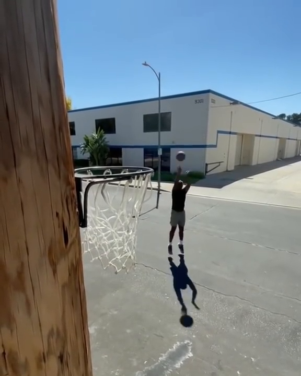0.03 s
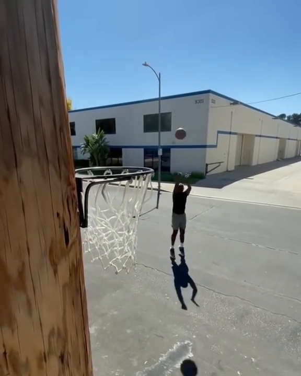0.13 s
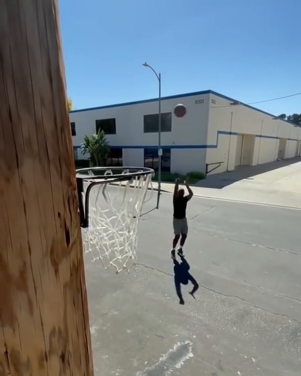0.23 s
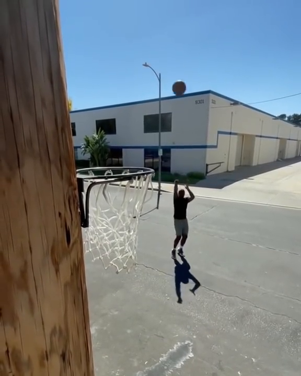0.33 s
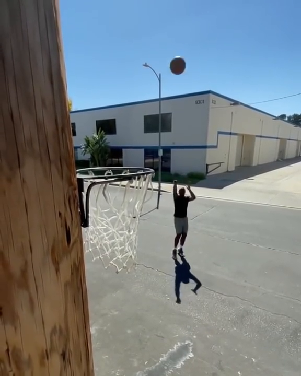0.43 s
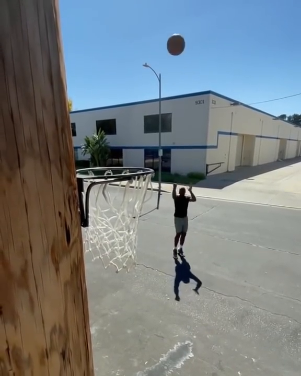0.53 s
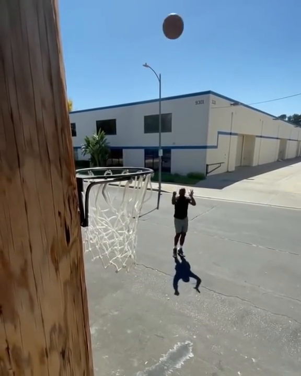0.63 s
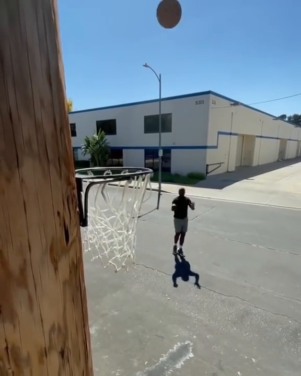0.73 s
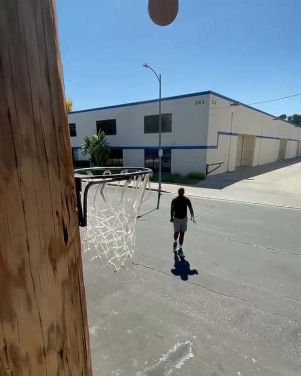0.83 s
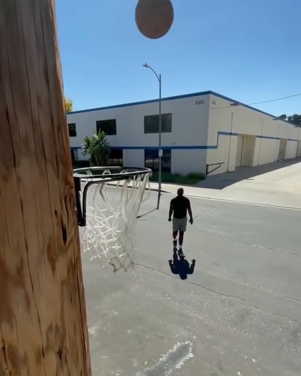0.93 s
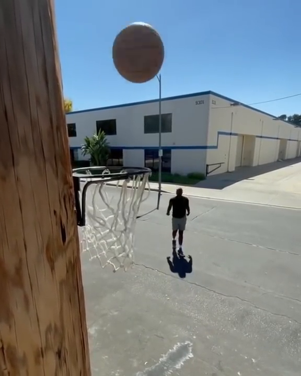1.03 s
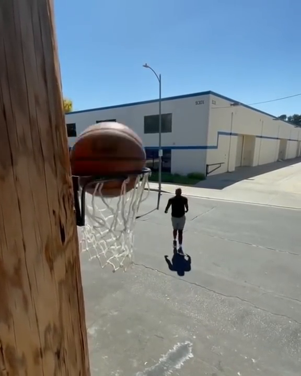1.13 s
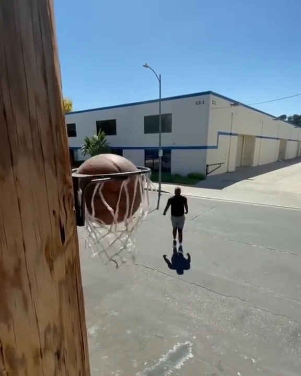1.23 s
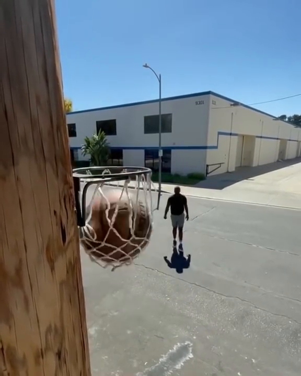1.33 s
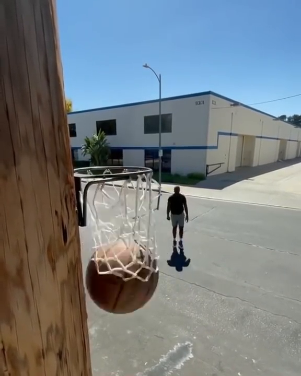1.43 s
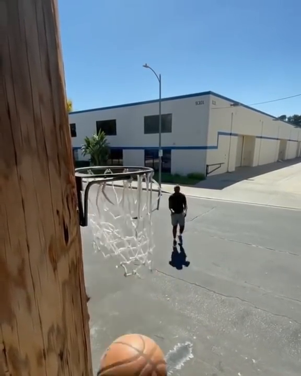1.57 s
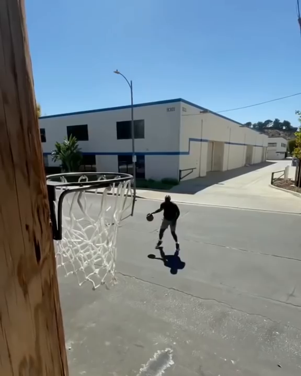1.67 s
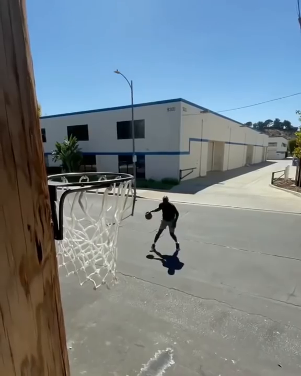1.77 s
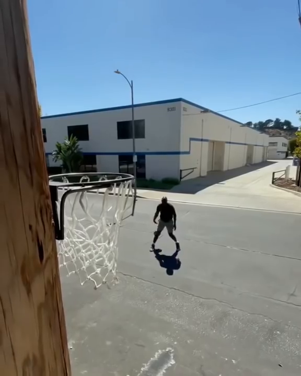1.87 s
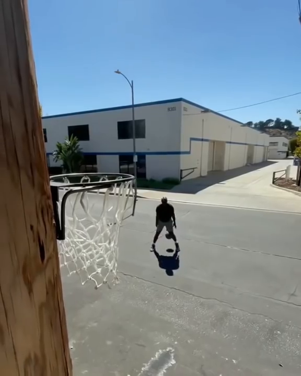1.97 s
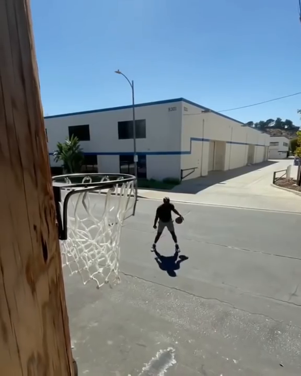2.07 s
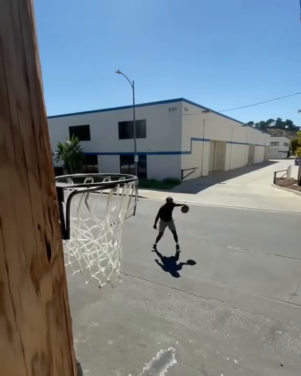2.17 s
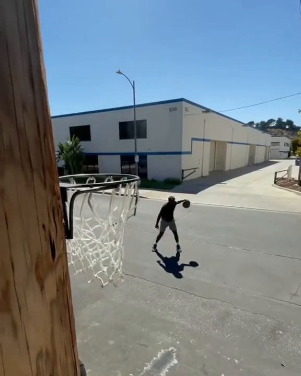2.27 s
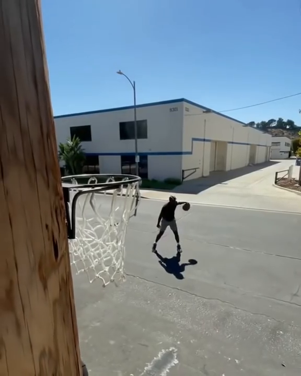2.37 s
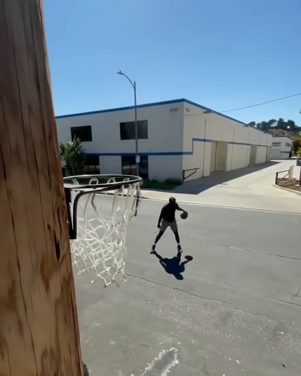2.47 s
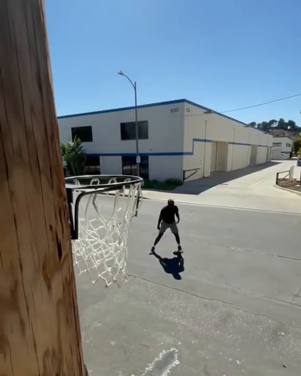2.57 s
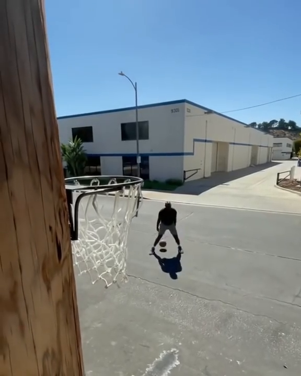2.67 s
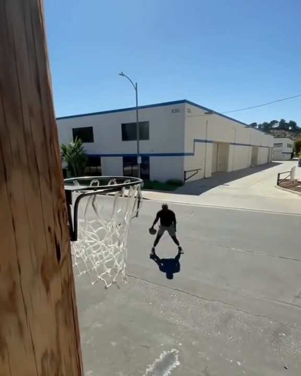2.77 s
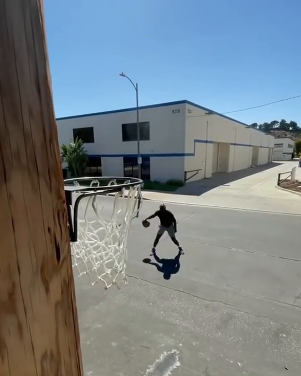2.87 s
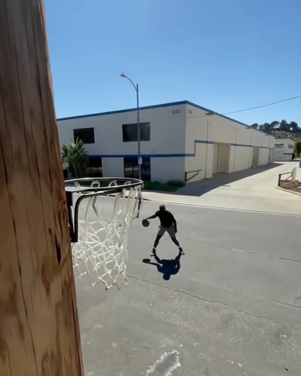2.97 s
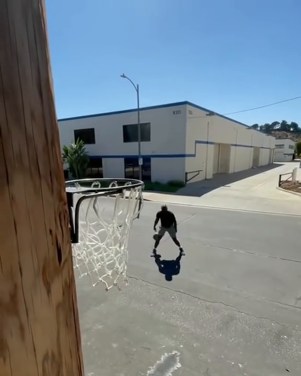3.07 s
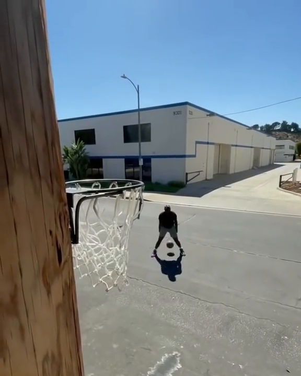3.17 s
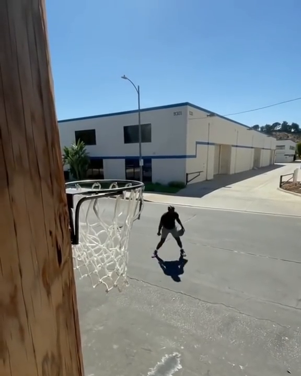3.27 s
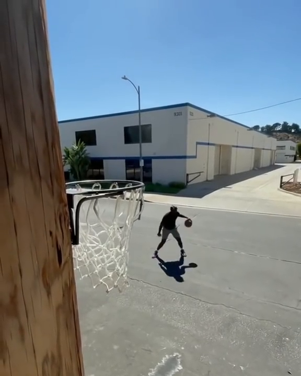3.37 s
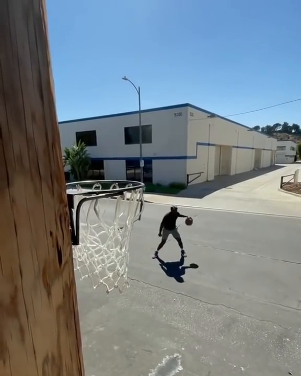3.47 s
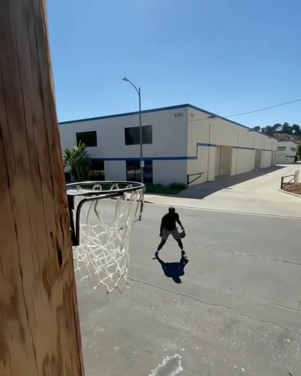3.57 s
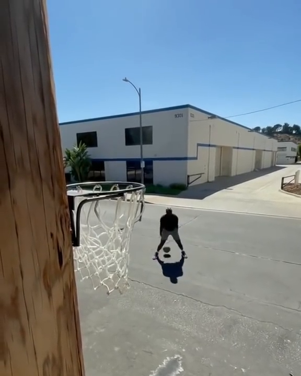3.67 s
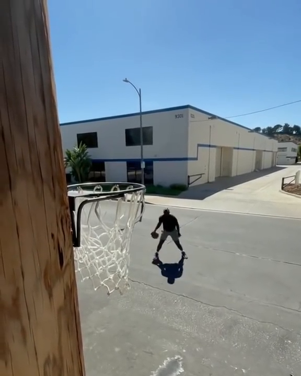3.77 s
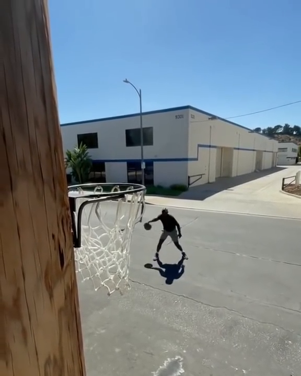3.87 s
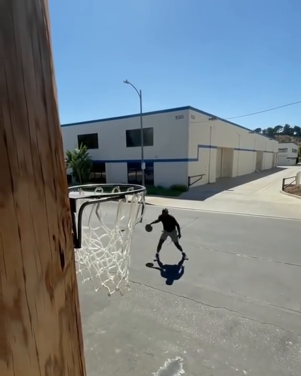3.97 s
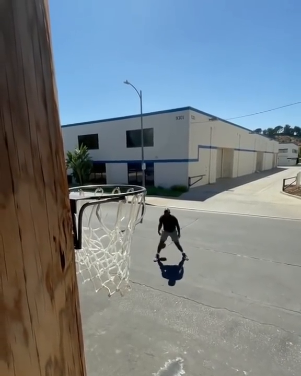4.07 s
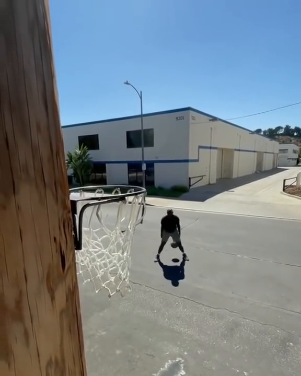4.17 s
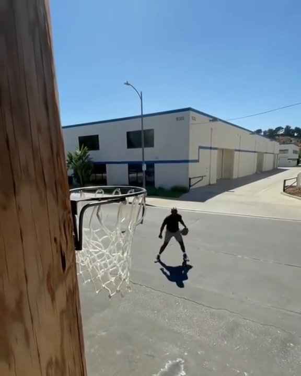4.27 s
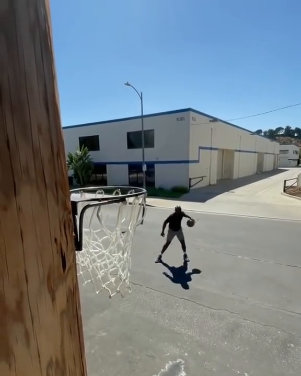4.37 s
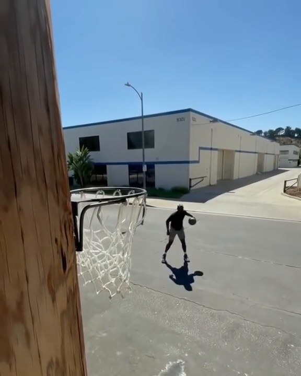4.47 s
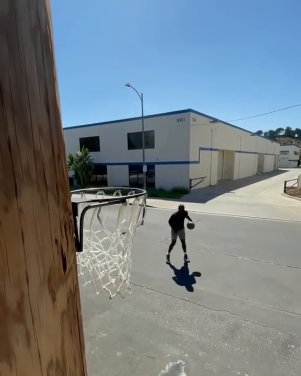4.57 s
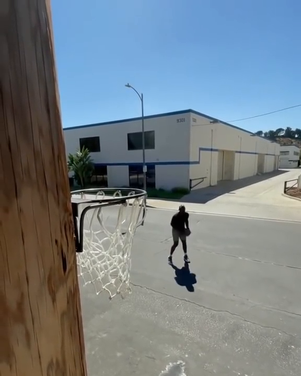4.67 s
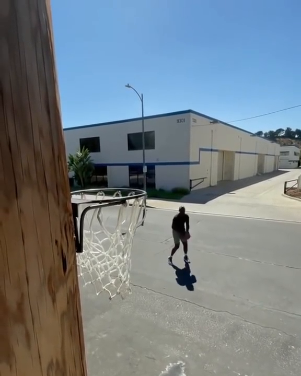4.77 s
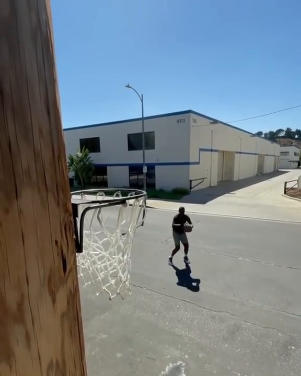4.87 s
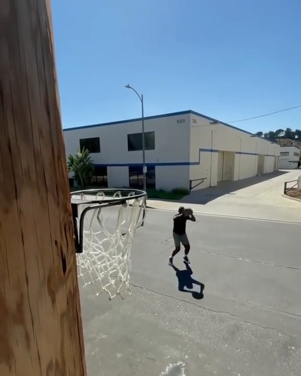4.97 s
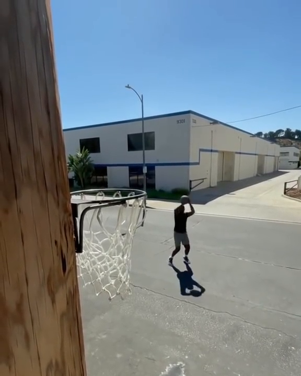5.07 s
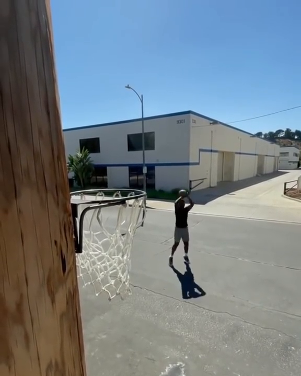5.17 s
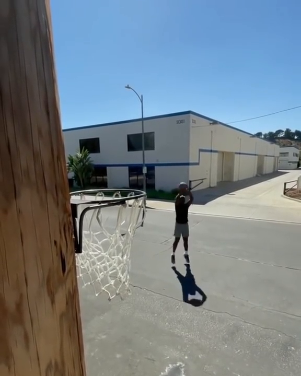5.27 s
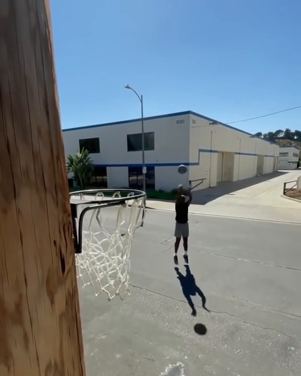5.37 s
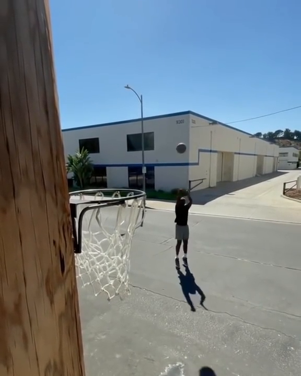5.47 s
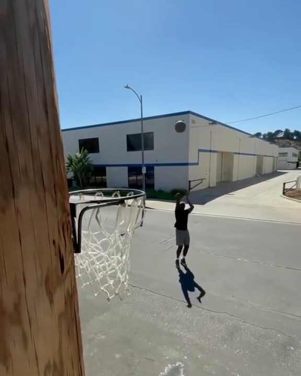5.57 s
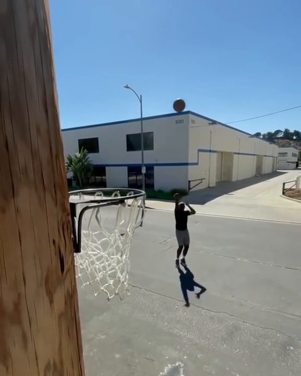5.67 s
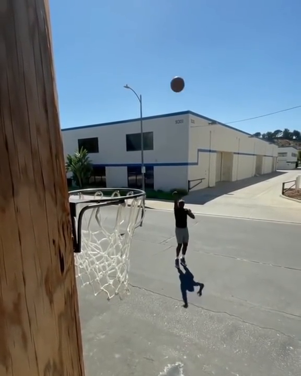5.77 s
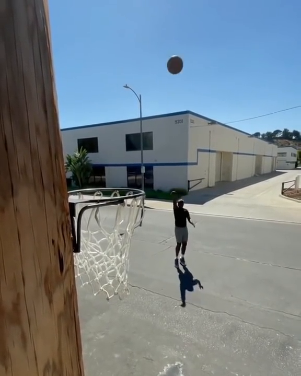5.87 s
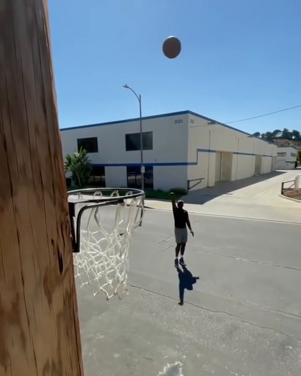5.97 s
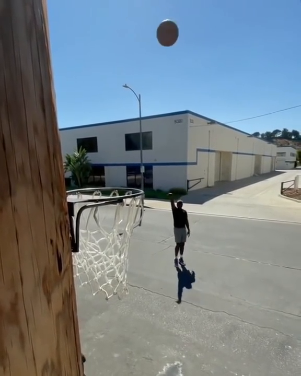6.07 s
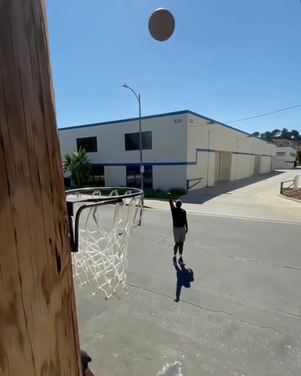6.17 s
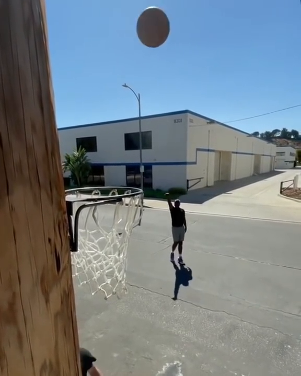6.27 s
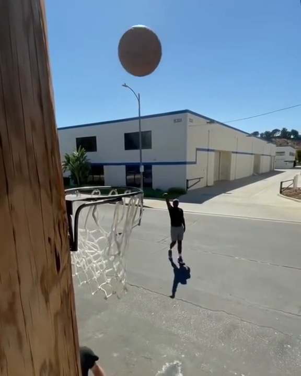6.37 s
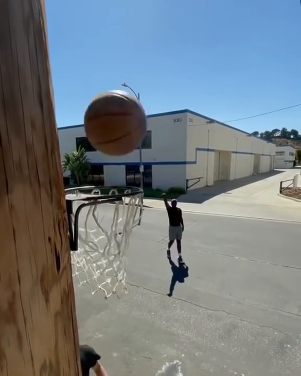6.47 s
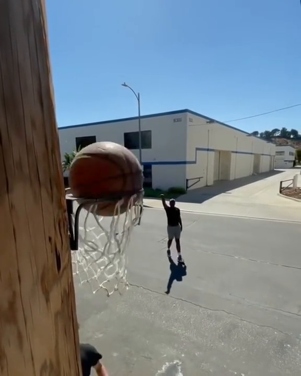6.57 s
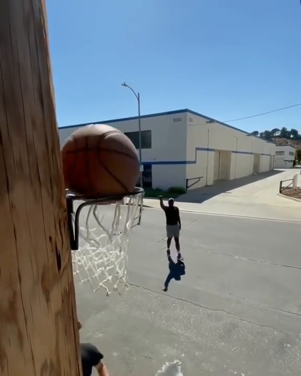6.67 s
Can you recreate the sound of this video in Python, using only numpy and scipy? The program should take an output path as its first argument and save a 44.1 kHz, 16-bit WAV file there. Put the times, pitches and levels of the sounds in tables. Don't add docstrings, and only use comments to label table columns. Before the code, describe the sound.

On an open street, a basketball hits a steel rim in a quick, loud double knock that shudders the wooden pole, and the net snaps. After a brief dip in level, five firm slapping bounces on asphalt follow some metres off, then a faint touch. Shoes scuff, wind buffets, and a final hard rim clatter ends it. Stereo phone microphone fixed to the pole.

```python
import sys
import numpy as np
from scipy import signal
from scipy.fft import rfft, irfft
from scipy.io import wavfile
from scipy.ndimage import uniform_filter1d

SR = 44100
rng = np.random.default_rng(int(sys.argv[2]) if len(sys.argv) > 2 else 0)


def gain_from_db(level_db):
    decades = np.asarray(level_db, float) / 20
    return 10 ** decades


def dump(signal):
    limited = np.clip(np.atleast_2d(signal).T, -1, 1)
    pcm = np.round(limited * 32767).astype(np.int16)
    wavfile.write(sys.argv[1], SR, pcm)


N = 295581
OPPOSITE = np.array([[1], [-1]])


def span(seconds):
    return np.arange(int(seconds * SR)) / SR


def colour(x, points):
    hz, db = np.transpose(points)
    f = np.maximum(np.fft.rfftfreq(x.shape[-1], 1 / SR), 1)
    gain = gain_from_db(np.interp(np.log(f), np.log(hz), db))
    y = irfft(rfft(x) * gain, x.shape[-1])
    return y / np.sqrt(np.mean(y ** 2))


def band(x, hz, octaves):
    edges = np.clip(hz * 2 ** np.array([-octaves / 2, octaves / 2]), 10, .45 * SR)
    return signal.sosfilt(signal.butter(2, edges, "band", fs=SR, output="sos"), x)


def walk(rate_hz):
    k = int(SR / rate_hz)
    held = np.repeat(rng.standard_normal(N // 200), k)[:N]
    return uniform_filter1d(uniform_filter1d(held, k), k)


def add(out, start_s, sound):
    i = int(start_s * SR)
    n = min(sound.shape[-1], N - i)
    out[..., i:i + n] += sound[..., :n]


def noises(side, size=N):
    mid, other = rng.standard_normal((2, size))
    return mid + side * other * OPPOSITE


def noise_burst(t, hz, octaves, t60_s):
    return band(rng.standard_normal(len(t)), hz, octaves) * gain_from_db(-60 * t / t60_s)


def ring(modes, t, push_s, longest_s, scatter_db, split, loose=1):
    hz, db, t60_s = np.transpose(modes)[:, :, None]
    chance = rng.standard_normal((4, 20, 1))[:, :len(modes)]
    chance[1::2] *= loose
    decay = gain_from_db(db + scatter_db * chance[0] - 60 * t / np.minimum(t60_s, longest_s))
    first = np.sin(2 * np.pi * hz * t + np.pi * chance[1])
    second = np.sin(2 * np.pi * hz * (1 + split * chance[2]) * t + np.pi * chance[3])
    y = np.sum(decay * (first + second), axis=0) * (1 - np.exp(-t / push_s))
    return y / np.max(np.abs(y))


def chirp(t, hz, fall, rise_s, power):
    swell = (t / rise_s * np.exp(1 - t / rise_s)) ** power
    return swell * np.sin(2 * np.pi * hz * (t + fall * rise_s * (1 - np.exp(-t / rise_s))))


def spit(t, treble_db, top_db, t60_s):
    grit = noises(1.0, size=len(t))
    low = band(band(grit, 5600, 1.31), 5600, 1.31)
    top = band(band(grit, 11600, 0.3), 11600, 0.3) * gain_from_db([[3.], [-3.]])
    envelope = gain_from_db(-60 * t / t60_s) * (1 - np.exp(-t / 0.001))
    return (gain_from_db(treble_db - 1.5) * low + gain_from_db(top_db + 4.0) * top) * envelope


# hz, level_db_per_hz
TOWN_SPECTRUM = [(88, -40.5), (150, -5), (270, -4.5), (318, -3.5), (370, -5), (710, -8), (795, -8.5),
                 (1060, -14.5), (3000, -34), (3900, -65.5), (6600, -120)]


def town():
    t = np.arange(N) / SR
    level_db, lull_s, lull_width_s, lull_db = -50.5, 0.266, .04, -6
    lull = lull_db * np.exp(-((t - lull_s) / lull_width_s) ** 2)
    noise = colour(noises(0.44), TOWN_SPECTRUM)
    swells = sum(band(noise, hz, 1.) * .25 * walk(14) for hz in (300, 700, 1500))
    noise = noise * gain_from_db(1.2 * walk(9)) + swells
    hum_hz = 318.4 * (1 + 0.01215 * walk(12))
    hum = gain_from_db(-53.5 + 2.6 * walk(7.2)) * np.sin(2 * np.pi * np.cumsum(hum_hz) / SR)
    return gain_from_db(level_db + lull) * noise + hum


# hz, level_db_per_hz
PORT_SPECTRUM = [(1060, -27.5), (1800, -2.5), (2320, 1), (2930, 0), (5090, -0.5), (9050, -8), (9880, -3.5),
                 (11400, 0), (12100, -10.5), (13600, -53), (14500, -55.5)]


def hiss():
    t = np.arange(N) / SR
    drop_s, glow_db, glow_t60_s = 1.45, -57, 1.6
    noise = colour(noises(1.0), PORT_SPECTRUM)
    low = band(noise, 4300, 2.3) * gain_from_db(1.5 * walk(20))
    top = band(noise, 11200, .4) * gain_from_db(5 * walk(18))
    glow = sum(gain_from_db(db + glow_db - 60 * np.abs(t - s) / glow_t60_s) * (t > s)
               for s, db, *_ in BOUNCES + BLOWS)
    low_gain = gain_from_db(np.where(t < drop_s, -60, -67.5))
    top_gain = gain_from_db(np.where(t < drop_s, -72, -81))
    return (low_gain + glow) * low + (top_gain + gain_from_db(-2) * glow) * top


# hz, level_db_per_hz
WIND_SPECTRUM = [(12, -55), (20, -21.5), (65, 1.5), (197, -8), (288, -24.5), (321, -16.5), (372, -39.5),
                 (500, -32.5), (650, -36.5), (1100, -120)]
# start_s, level_db, port_difference_db
BREEZE_LEVELS = [(0, -60, 5), (.28, -68, 15), (.6, -53.5, -10), (.83, -64, 16), (1.2, -48.5, -10),
                 (1.42, -37, -52), (1.75, -48, -1.5), (2.0, -37.5, -0.5), (2.45, -44.5, -6),
                 (2.9, -45, -25), (3.35, -37, -18), (3.75, -39, -18), (4.1, -41.5, -0.5),
                 (4.6, -43.5, -6.5), (4.949, -42.5, 3), (5.45, -37.5, -18), (5.8, -45, -44),
                 (6.57, -41, -11)]
# start_s, peak_db, length_s
WIND_BUFFETS = [(.05, -53, 0.036), (0.21, -58.5, 0.063), (0.354, -57, 0.038), (.45, -60, 0.027),
                (0.53, -56, 0.022), (0.622, -55, 0.047), (0.892, -49, 0.015), (1.58, -45, 0.02),
                (1.812, -40, 0.027), (1.869, -38, 0.018), (2.16, -43, 0.024), (2.372, -49, 0.036),
                (2.598, -47, 0.051), (2.878, -38, 0.025), (3.015, -47, 0.021), (3.107, -53, 0.013),
                (3.548, -40, 0.03), (3.84, -38, 0.043), (3.94, -58, 0.046), (4.238, -40, 0.024),
                (4.352, -42, 0.048), (4.739, -39, 0.02), (5.047, -34, 0.032), (5.137, -34, 0.016),
                (5.254, -40.5, 0.056), (5.584, -48, 0.021), (6.088, -50.5, 0.23)]


def wind():
    t = np.arange(N) / SR
    start_s, *columns = np.transpose(BREEZE_LEVELS)
    breeze_db, side_db = (np.interp(t, start_s, c) for c in columns)
    buffets = sum(gain_from_db(db) * np.exp(-((t - s) / length_s) ** 2) for s, db, length_s in WIND_BUFFETS)
    flutter = gain_from_db([2.5 * walk(25), 3.5 * walk(14)])
    mid, side = colour(rng.standard_normal((2, N)), WIND_SPECTRUM) * flutter
    return (gain_from_db(breeze_db) + buffets) * (mid + gain_from_db(side_db) * side * OPPOSITE) * gain_from_db([[.9], [-.9]])


# start_s, length_s, pitch_hz, level_db, waver_0_to_1
FAR_WHISTLES = [(2.85, .28, 2905, -65, .004), (3.28, .27, 2905, -63, .005), (3.42, .3, 3950, -58, .08),
                (3.925, .2, 2905, -57, .004), (1.4, .1, 850, -51, .04)]


def whistles():
    out = np.zeros((2, N))
    for s, length_s, hz, db, waver in FAR_WHISTLES:
        t = span(length_s)
        phase = 2 * np.pi * np.cumsum(hz * (1 + waver * walk(150)[:len(t)])) / SR
        swell = np.sin(np.pi * t / length_s) ** .5
        add(out, s, gain_from_db(db + 4 * walk(40)[:len(t)]) * np.sin(phase) * swell)
    return out


# delay_s, level_db
WALL_ECHOES = [(0.05, -38.5), (0.097, -36), (.129, -44), (0.208, -37)]


def street(x):
    t = span(0.79)
    noise = rng.standard_normal(len(t)) + .5 * rng.standard_normal((2, len(t)))
    tail = gain_from_db(-41) * band(noise, 490, 1.6) * gain_from_db(-60 * t / .5)
    tail += gain_from_db(-45.5) * band(noise, 5200, 3.8) * gain_from_db(-60 * t / 0.47)
    tail *= 1 - np.exp(-t / .012)
    wall = band(rng.standard_normal((2, 700)) * np.hanning(700), 790, 4.2) * 0.061
    for delay_s, db in WALL_ECHOES:
        add(tail, delay_s, gain_from_db(db) * wall)
    return signal.fftconvolve(x[None], tail, axes=1)[:, :N]


def puff(length_s, grit_db, top_db, body_db):
    t = span(.2)
    x = t / max(length_s, .002)
    body = gain_from_db(body_db + 2.5) * band(rng.standard_normal(len(t)), 1640, 1.64)
    return (spit(t, grit_db - 12.0, top_db - 6.0, 3.8) + body) * np.sqrt(x) * np.exp(-2 * x) * 3


# start_s, grit_peak_db, sole_db, length_s,
# upper_port_ring_above_usual_db
SHOE_SCUFFS = [(1.5525, -35.5, -49, 0.056, -12), (1.718, -38, -50, 0.02, -14), (1.736, -40, -71, 0.023, 0),
               (1.877, -42, -45, 0.041, 5.5), (2.037, -39, -65, 0.0038, 29), (2.1215, -27, -35, 0.03, 0),
               (2.274, -60, -46.5, 0.034, 13), (2.488, -48.5, -53, 0.023, -3),
               (2.866, -47.5, -50.5, 0.072, 8), (2.986, -50, -65, 0.06, 2), (3.43, -60, -55, 0.074, 15),
               (3.9804, -50, -45, 0.03, 7), (4.145, -40, -52, 0.015, -5), (4.2864, -57, -44.5, 0.058, -2),
               (4.389, -44, -50, 0.028, -5), (4.70, -60, -73, 0.05, 17), (4.812, -53, -35.5, 0.01, 11),
               (5.055, -48, -53, 0.041, -22), (5.6994, -50, -54.5, 0.045, -8),
               (6.2095, -44, -54, 0.061, -3), (6.269, -39, -77, 0.019, -20),
               (6.4994, -36.5, -45.5, 0.022, 2.5)]


def scuffs():
    out = np.zeros((2, N))
    for s, grit_db, sole_db, length_s, ring_db in SHOE_SCUFFS:
        add(out, s, puff(length_s, grit_db, grit_db - 12.5 + ring_db, sole_db))
    return out


# start_s, grit_peak_db, body_db, length_s
NET_SNAPS = [(1.1055, -28.5, -64, 0.0035), (1.515, -7, -32, 0.0018), (1.586, -28.5, -50, 0.0055),
             (1.774, -59, -49, 0.0069), (2.1714, -36, -32.5, 0.01), (2.606, -61, -55, 0.005),
             (3.8706, -52, -34, 0.0055), (3.898, -62, -37.5, 0.0057), (4.36, -59, -42.5, 0.006),
             (4.452, -37, -50, 0.012), (4.473, -33, -47, 0.013), (4.9014, -80, -43.5, 0.005),
             (5.0325, -39.5, -64, 0.0084)]


def snaps():
    out = np.zeros((2, N))
    for s, grit_db, body_db, length_s in NET_SNAPS:
        add(out, s, puff(length_s, grit_db, grit_db - 18, body_db))
    return out


# time_s, level_db
NET_BRUSH = [(1.27, -35), (1.3, -47), (1.36, -56.5), (1.442, -50), (1.522, -57.5), (1.554, -63), (1.6, -86)]


def net():
    time_s, db = np.transpose(NET_BRUSH)
    spectrum = [(3500, -30), (6000, -12.5), (9000, -7), (11500, 3), (13500, -17.0)]  # hz, db
    level_db = np.interp(np.arange(N) / SR, time_s, db + 0.77, -120, -120) + 3.8 * walk(59.9)
    return colour(noises(0.94), spectrum) * gain_from_db(level_db)


# start_s, crack_peak_db, pole_db, steel_db, grit_db
BLOWS = [
    (1.2393, -14.5, -5, -11.5, -20),
    (1.2538, -20, -4.5, -11.5, -25),
    (1.2659, -19, -13.5, -26, -26),
    (6.601, -20, -19.5, -20, -32.5),
    (6.621, -14.5, -2.5, -10.5, -19.5),
    (6.6341, -26, -9.5, -14, -26.5),
    (6.6474, -27, -27, -42, -41),
    (6.6722, -34, -14, -35, -40),
    (6.6773, -34, -13, -52, -52),
]
# pitch_hz, level_db, t60_s
POLE_MODES = [(111.4, -8, 0.089), (158.5, 5, 0.044), (241.4, -6, 0.08), (290, -15.5, 0.12),
              (324.4, -13, 0.21), (370, -18.5, 0.99)]
# pitch_hz, level_db, t60_s
STEEL_MODES = [(392.3, -4, 0.1), (601.5, -2.5, 0.098), (728, 9.5, 0.043), (835.5, -5, 0.3),
               (894, 1.5, 0.013), (941, 3.5, 0.031), (1213, 1, 0.074), (1613, -13.5, 0.48),
               (1960, -26.5, 0.31), (2270, -10, 0.093), (2090, -7, 0.07), (2190, -21.5, 0.1),
               (2670, -16, 0.51), (2870, -10, 0.078)]
# pitch_hz, level_db, t60_s
LONG_RING_MODES = [(2222, 0, .6), (2770, 0, .18), (2902, -10, .9), (1690, -3, .15)]
# start_s, peak_db, t60_s
POLE_SWAYS = [(1.2455, -4.5, 0.18), (6.6232, -8, 0.14)]
# start_s, peak_db, pitch_hz
RIM_SLAPS = [(1.238, -20.5, 1070), (6.599, -7, 1060), (6.6185, -8.5, 1106)]


def hoop():
    out, t = np.zeros((2, N)), span(.6)
    for s, crack_db, pole_db, steel_db, grit_db in BLOWS:
        crack = -chirp(t, 850, fall=1.7, rise_s=.0014, power=1.4) + 1.2 * noise_burst(t, 2300, 1.2, .04)
        ring_db = crack_db - 27 + 4 * walk(45)[:len(t)]
        long_ring = ring(LONG_RING_MODES, t, .012, 1.6, 1.5, .004)
        add(out, s, gain_from_db(crack_db + 4.5) * crack + gain_from_db(ring_db) * long_ring)
        add(out, s, spit(t, grit_db + 7.5, grit_db + 8, 0.017))
        add(out, s, spit(t, grit_db - 15.0, grit_db - 19.5, 0.33))
        add(out, s, gain_from_db(pole_db - 1.5) * ring(POLE_MODES, t, 0.004, 0.083, 1.5, 0.046, loose=0.3))
        rattle = 3.7 * noise_burst(t, 600, 1.67, 0.0388)
        steel = gain_from_db(steel_db + 3.0) * (ring(STEEL_MODES, t, 0.00031, 0.18, 1.0, 0.014) + rattle)
        add(out, s, steel + 0.44 * band(steel, 730, 1.8) * OPPOSITE)
    for s, db, t60_s in POLE_SWAYS:
        add(out, s, gain_from_db(db - 60 * t / t60_s) * np.sin(2 * np.pi * 87 * t))
    for s, db, hz in RIM_SLAPS:
        add(out, s, gain_from_db(db) * chirp(t, hz, fall=0.33, rise_s=0.0034, power=6.1))
    return signal.sosfilt(signal.butter(2, 55, "high", fs=SR, output="sos"), out)


# start_s, slap_peak_db, thump_db, slap_pitch_hz, grit_db
BOUNCES = [
    (2.038, -7.5, -21.5, 950, -35.5),
    (2.77, -9.5, -24, 1270, -39.5),
    (3.256, -6, -23, 1030, -56),
    (3.772, -3.5, -22.5, 1260, -30.5),
    (4.231, -9, -23.5, 1166, -37),
    (4.8, -19.5, -37.5, 855, -44.5),
]
# pitch_hz, level_db, t60_s
BALL_MODES = [(733, -5, 0.028), (1270, -12.5, 0.3), (1644, -16.5, 0.39), (2070, -18, 0.69),
              (2170, -31, 0.18), (2860, -39, 0.031), (2510, -18, 0.2), (2910, -22, 0.39), (3180, -22, 0.66)]


def dribble():
    out, t = np.zeros((2, N)), span(.6)
    for s, slap_db, thump_db, hz, grit_db in BOUNCES:
        skin = -chirp(t, 0.756 * hz, fall=1.296, rise_s=0.0017, power=4.2)
        skin += 0.91 * chirp(t, 1986, fall=0.98, rise_s=0.00037, power=0.79)
        skin += 0.69 * noise_burst(t, 2380, 1.62, 0.017)
        air = ring(BALL_MODES, t, 0.0049, 0.07, 5, 0.04)
        add(out, s, gain_from_db(slap_db - 5.5) * (skin + gain_from_db(-11) * air))
        add(out, s + 0.00053, gain_from_db(thump_db - 1.0) * chirp(t, 154.4, fall=1.475, rise_s=0.0094, power=4.1))
        add(out, s, gain_from_db(thump_db + 12) * noise_burst(t, 374, 2.18, 0.07))
        add(out, s + .0097, gain_from_db(thump_db + 2.0) * chirp(t, 783, fall=0.47, rise_s=0.0022, power=1.0))
        add(out, s - .0005, gain_from_db(thump_db + 9) * chirp(t, 72, fall=1.2, rise_s=.0165, power=5.5))
        add(out, s, spit(t, grit_db + 15.5, -27.5, 0.011) + spit(t, grit_db - 3.0, -75, 0.18))
    return out


def scene():
    background = town() + hiss() + wind() + whistles()
    rim, ball = hoop(), dribble()
    echoes = street((ball + gain_from_db(1) * rim).mean(axis=0))
    return background + echoes + scuffs() + snaps() + net() + rim + ball


# pitch_hz, left_lead_rad
PORT_LEAD = [(0, 0), (1900, 0), (3500, 3.1), (12000, 12.4), (15000, 13)]


def ports(dry):
    hz, lead_rad = np.transpose(PORT_LEAD)
    turn = np.exp(-1j * np.interp(np.fft.rfftfreq(N, 1 / SR), hz, lead_rad))
    return np.array([dry[0] * gain_from_db(2.29), irfft(rfft(dry[1]) * turn, N) * gain_from_db(2.35)])


def holes(x, share, quiet_db):
    hz, s, z = signal.stft(x, SR, nperseg=512)
    patch = rng.random((60, len(s) // 8 + 1))
    chance = patch[np.sqrt(hz / 7).astype(int)][:, np.arange(len(s)) // 8]
    odds = share * (hz[:, None] > 2400) * (1 + (hz[:, None] / 6000) ** 3)
    drop = (chance < odds) & (np.abs(z).mean(axis=0) < gain_from_db(quiet_db))
    return signal.istft(z * np.where(drop, .05, 1), SR, nperseg=512)[1][:, :N]


def band_limit(x):
    return signal.sosfilt(signal.butter(12, 15010, fs=SR, output="sos"), x)


def record(dry):
    change_s, width_s = 1.762, .014
    x = ports(dry) * np.clip(np.abs(np.arange(N) / SR - change_s) / width_s, .06, 1)
    x = np.tanh(.8 * x) / .8
    x = signal.sosfilt(signal.ellip(6, 1, 32, 12900, fs=SR, output="sos"), x)
    return band_limit(holes(x, share=.045, quiet_db=-68))


dry = scene()
out = record(dry)
dump(out)
```